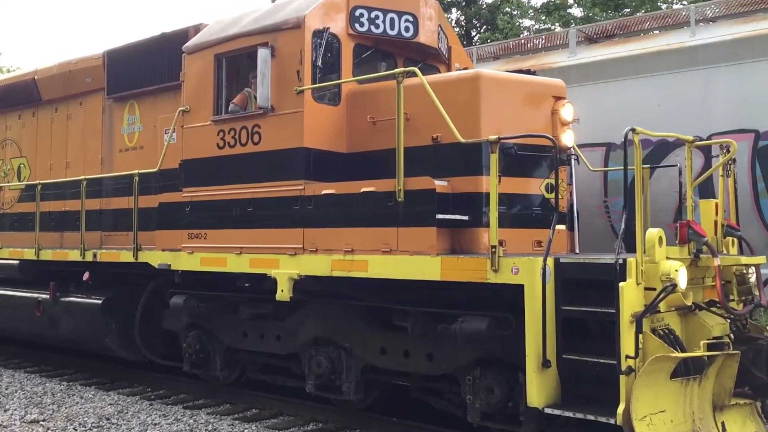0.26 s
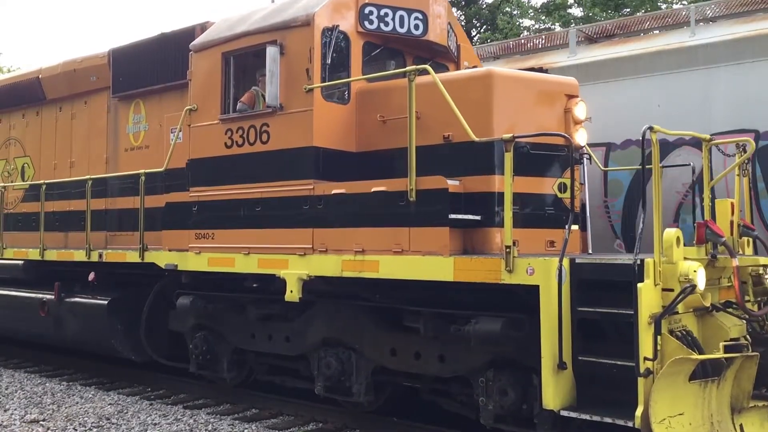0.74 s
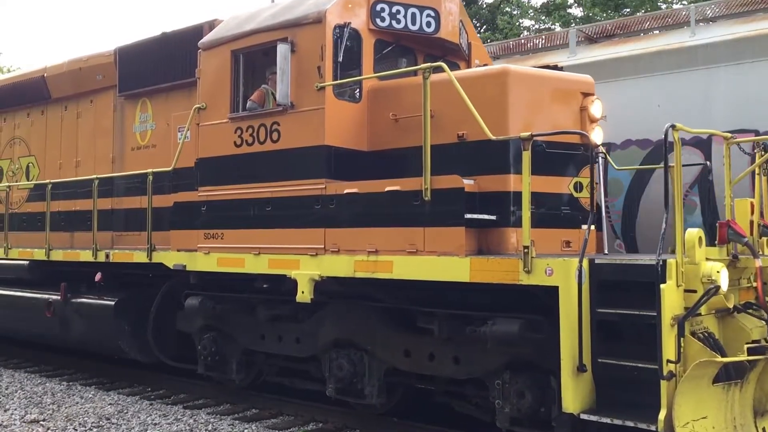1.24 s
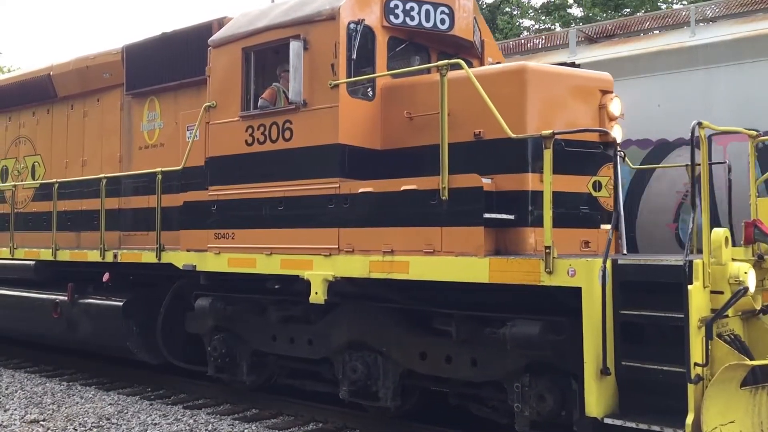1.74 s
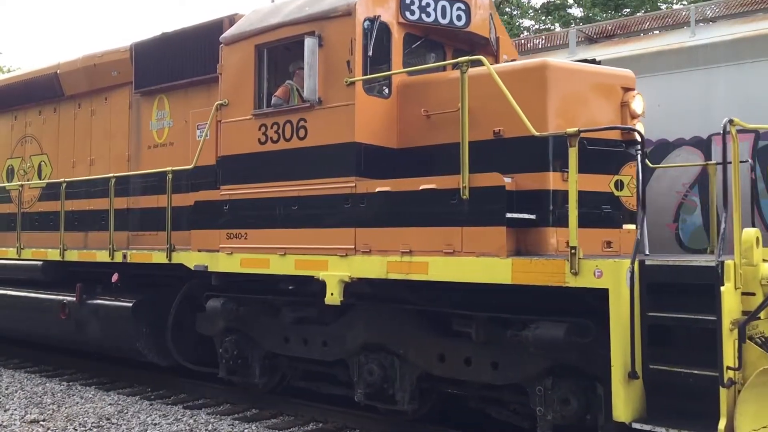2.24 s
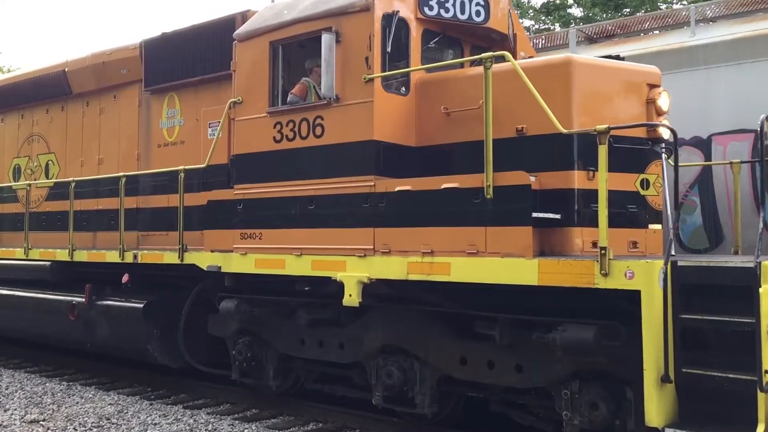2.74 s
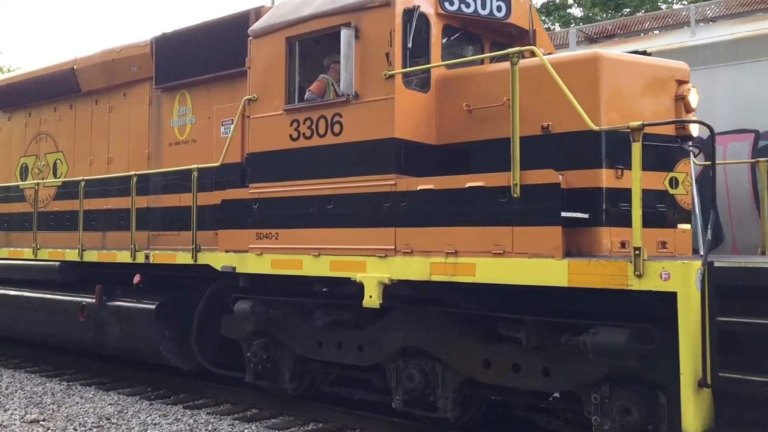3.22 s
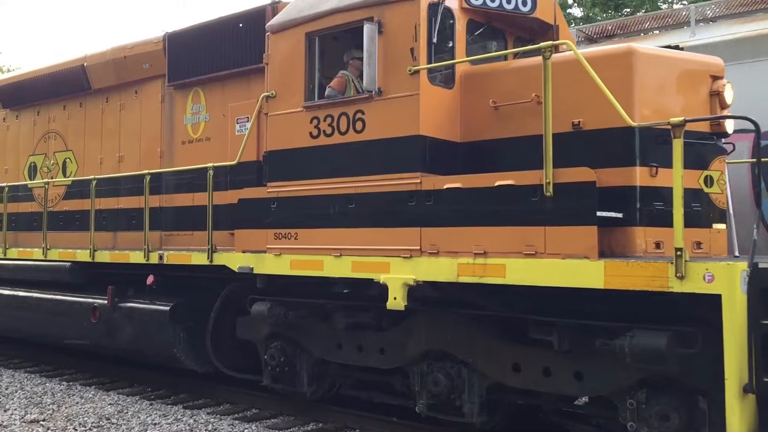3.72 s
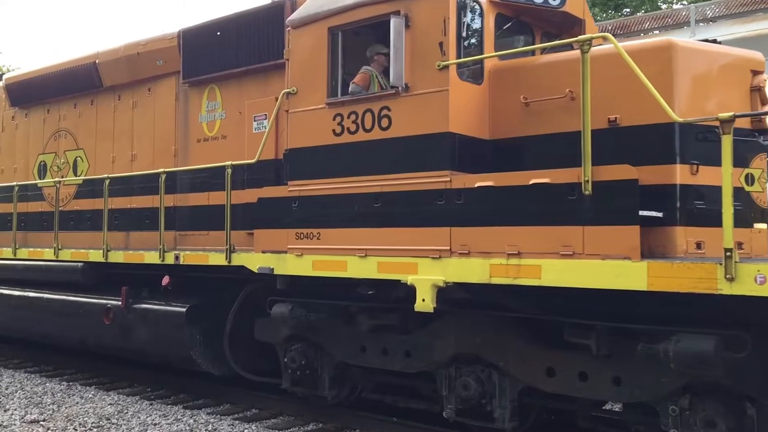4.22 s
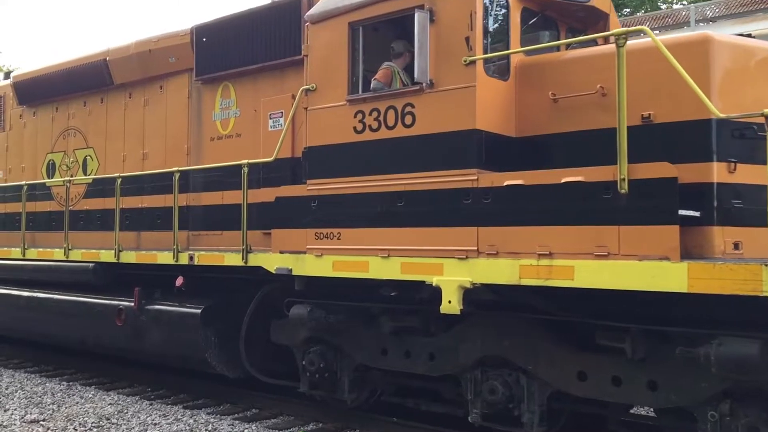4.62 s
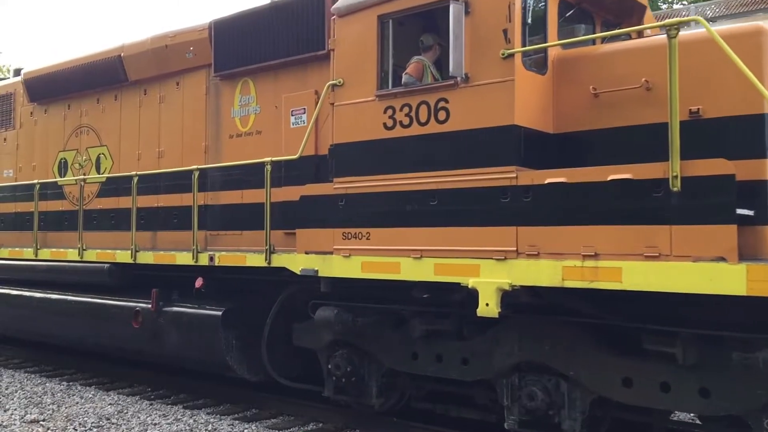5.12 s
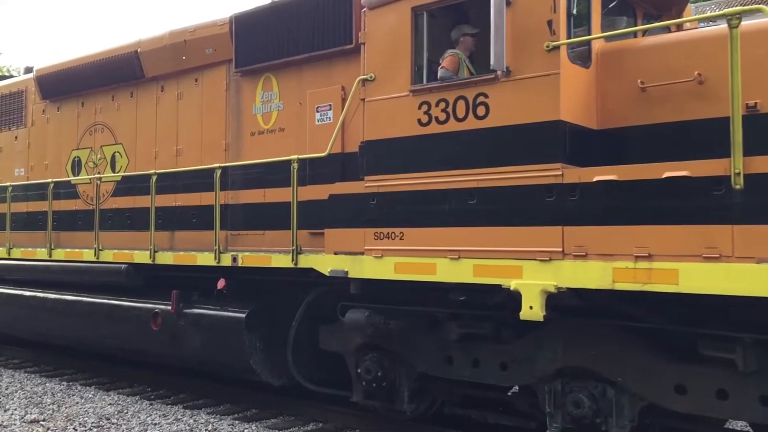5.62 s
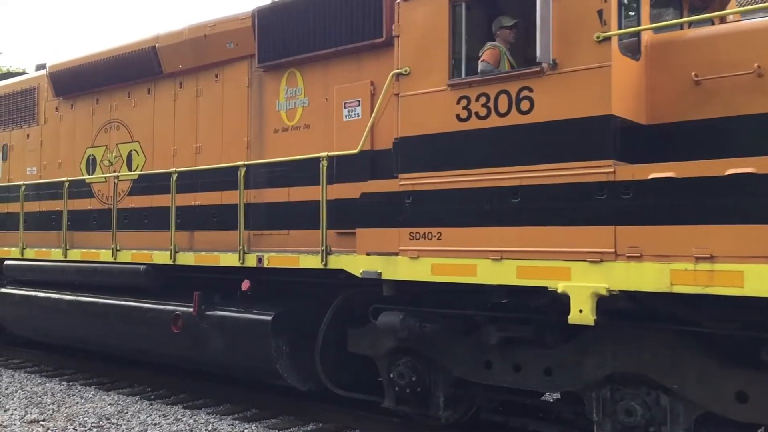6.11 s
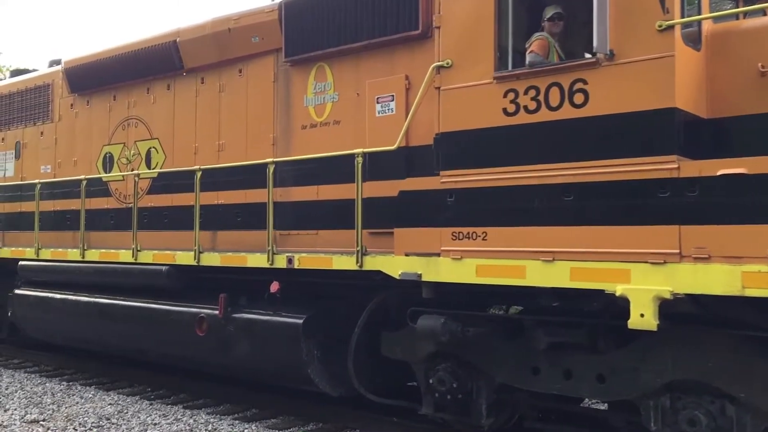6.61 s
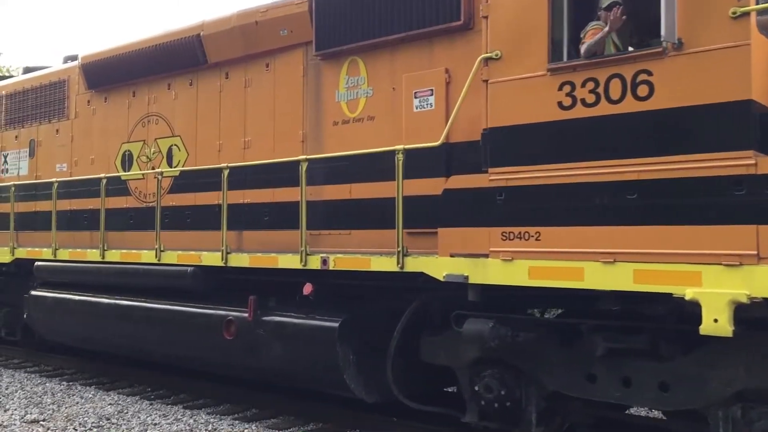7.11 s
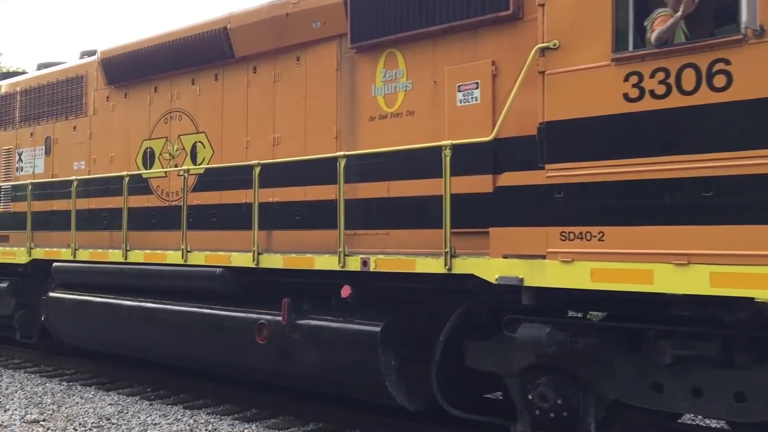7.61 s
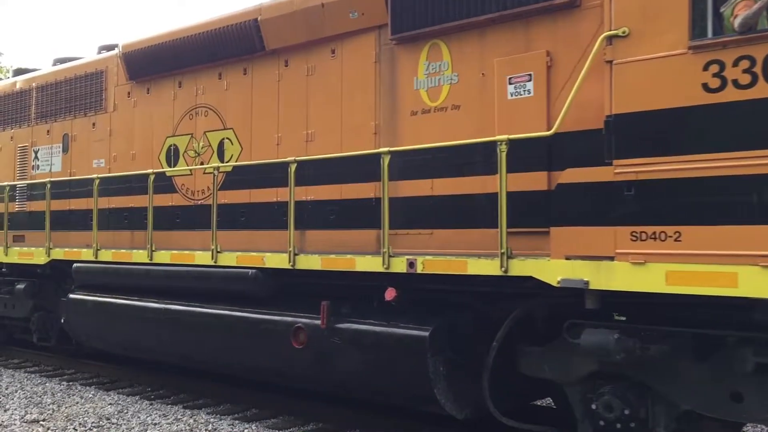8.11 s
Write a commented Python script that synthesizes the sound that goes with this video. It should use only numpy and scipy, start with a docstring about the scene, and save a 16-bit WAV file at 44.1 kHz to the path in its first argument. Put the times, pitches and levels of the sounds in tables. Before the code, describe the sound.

Two coupled diesel locomotives creep past a few metres from a trackside microphone, outdoors. Their low chugging drone rises slightly in pitch during the first two seconds, then holds, beating nearly three times a second. Wavering blower and fan whines ride over broad rushing air. Short sharp air spits come roughly once a second, strongest near the end, beside a brief steel squeak.

```python
"""Two coupled diesel locomotives throb a few metres from the microphone and throttle up one notch as they creep past.
Their sixteen-cylinder two-stroke engines turn at slightly different speeds, so harmonics of the two cranks beat.
Blowers, fans, a generator and gears whine as wavering sines at fixed multiples of crank speed.
Filtered noise makes the rushing air and the spits of a drain valve on the air tanks; near the end steel squeaks."""
import sys
import numpy as np
from scipy import signal
from scipy.fft import irfft
from scipy.io import wavfile

SR = 44100
rng = np.random.default_rng(int(sys.argv[2]) if len(sys.argv) > 2 else 0)


def store_wav(level_fs):
    """Save 16-bit WAV to argv[1]."""
    pcm = np.round(np.clip(np.atleast_2d(level_fs), -1, 1) * 32767)
    wavfile.write(sys.argv[1], SR, pcm.T.astype(np.int16))


N = 368229

# Crankshaft speed of the lead and trailing engines. Each row: time in seconds, speed in rpm.
LEAD_CRANK_SPEED = [(0, 593.0), (0.5, 610.7), (1, 628.0), (1.3, 636.3), (1.6, 641.5), (1.9, 643.6),
                    (2.3, 642.1), (2.8, 639.2), (3.5, 637.7), (4.5, 637.3), (5.5, 636.5), (6.5, 636.7),
                    (7.5, 636.9), (8.35, 636.9)]
TRAIL_CRANK_SPEED = [(0.0, 621.9), (0.35, 630.2), (0.7, 646.6), (1.0, 654.4), (1.3, 657.8), (1.7, 661.4),
                     (2.2, 660.2), (2.8, 657.4), (3.5, 657.7), (4.2, 655.8), (5.0, 657.1), (5.8, 655.6),
                     (6.6, 660.1), (7.3, 660.0), (8.35, 654.9)]
# Effort of the engines, heard in the rushing air. Each row: time in seconds, effort in dB.
ENGINE_EFFORT = [(0.0, -32.5), (0.49, -36.5), (1.0, -34), (2.81, -30.5), (6.14, -31.5), (7.56, -29.5),
                 (7.93, -30.5), (8.35, -29)]
# Lead engine's crank speed at the start and after throttling up; both exhausts are judged against these.
LEAD_START_RPM, LEAD_RUN_RPM = 593, 637


def from_db(db):
    """Decibels to gain."""
    return np.exp(np.asarray(db) * (np.log(10) / 20))


def rms_one(x):
    """Scale to unit power."""
    return x / np.sqrt(np.mean(x ** 2) + 1e-20)


def in_time(rows):
    """Each column of a curve, sample by sample."""
    s, *columns = np.transpose(rows)
    return [np.interp(np.arange(N) / SR, s, column) for column in columns]


def drift(rate_hz):
    """Smooth chance motion of spread 1: noise through two equal poles, made at every 40th sample."""
    step = 40
    r = np.exp(-2 * np.pi * rate_hz * step / SR)
    noise = rng.standard_normal(N // step + 2002)
    slow = signal.lfilter([1], [1, -2 * r, r * r], noise)[2000:]  # drop the filter's start
    return np.interp(np.arange(N) / step, np.arange(len(slow)), rms_one(slow))


def coloured_noise(spectrum, patchy_db):
    """Quarter-octave bands of noise, each flickering by itself; rms 1."""
    hz, level_db = np.transpose(spectrum)
    edges = 20 * 2 ** np.arange(0, 9.8, .25)
    white, out = rng.standard_normal((2, N)), np.zeros(N)
    for k, (low, high) in enumerate(zip(edges, edges[1:])):
        if high > hz[0] and low < hz[-1]:
            band_filter = signal.butter(2, [low, high], "band", fs=SR, output="sos")
            band = signal.sosfilt(band_filter, white[k % 2])  # neighbours use separate noise
            band_db = np.interp(np.log(low * high) / 2, np.log(hz), level_db)
            out += band * from_db(band_db + patchy_db * drift(5.6))
    return rms_one(out)


def tone(cycles, level_db, flutter, rate_hz):
    """A sine whose strength and phase waver."""
    angle = 2 * np.pi * cycles
    in_step = (1 + flutter * drift(rate_hz)) * np.cos(angle)
    out_of_step = flutter * drift(rate_hz) * np.sin(angle)
    return from_db(level_db) * (in_step + out_of_step) / np.sqrt(.5 + flutter ** 2)


def crank_turns(rpm_curve):
    """Turns of the crank made since the start."""
    return np.cumsum(in_time(rpm_curve)[0]) / (60 * SR)


def load(share):
    """Gain that follows a share of the effort as the engines take up the work."""
    effort_db, = in_time(ENGINE_EFFORT)
    return from_db(share * (effort_db - np.median(effort_db)))


def approach(level_db, db_per_s):
    """A level in dB that changes steadily as the lead unit creeps nearer, given for the moment midway."""
    midway_s = 4.2
    return level_db + db_per_s * (np.arange(N) / SR - midway_s)


def engines(lead, trail):
    """Both exhausts and the lead engine's clatter; the eighth orders beat nearly three times a second."""
    # Exhaust notes that change with throttle and nearness. Each row: multiple of crank speed, level in dB
    # at the lead's running speed before the stack's boom, gain from throttling up in dB, approach in dB per second.
    lead_main = [(5, -45.5, 13, 0.3), (6, -38.5, 16, 0), (7, -34.5, 1, 0), (8, -25.5, 1.5, -0.73),
                 (9, -34.5, 18, 1.8), (11, -31, 23, 0.16), (14, -37.5, 2, 0.8), (16, -28.5, 10, 0.41),
                 (17, -34, 7, 0), (18, -38, 0, -0.4), (20, -54, -17.5, 0)]
    trail_main = [(8, -27, 1, 0.091)]
    # Weaker notes from unequal cylinders. Each row: multiple of crank speed, level at median effort in dB.
    lead_weak = [(4, -75), (10, -42.5), (12, -46.5), (13, -42.5), (15, -41), (19, -66), (21, -46),
                 (22, -47.5), (23, -51.5), (25, -48.5), (30, -50), (36, -52.5), (40, -53), (44, -58.5),
                 (49, -53.5)]
    trail_weak = [(5, -52), (6, -40), (7, -45), (9, -36), (10, -36.5), (11, -43.5), (16, -56), (17, -46),
                  (21, -70), (27, -62)]
    strong = exhaust(lead, strong_notes(LEAD_CRANK_SPEED, lead_main), flutter=.06)
    strong += exhaust(trail, strong_notes(TRAIL_CRANK_SPEED, trail_main), flutter=.06)
    weak = exhaust(lead, lead_weak, flutter=.18) + exhaust(trail, trail_weak, flutter=.3) + clatter(lead)
    return strong + weak * load(share=1.0)


# The exhaust stack booms when a note comes through its resonance.
STACK_HZ, STACK_WIDTH_HZ, STACK_DB = 80.5, 0.67, 9


def strong_notes(rpm_curve, notes):
    """Level of each main exhaust note, set by throttle, nearness and the stack's resonance."""
    rpm, = in_time(rpm_curve)
    # 1 at the lead's starting speed, 0 at its running speed and above
    below_running = np.maximum(LEAD_RUN_RPM - rpm, 0) / (LEAD_RUN_RPM - LEAD_START_RPM)
    levels = []
    for order, level_db, throttle_db, db_per_s in notes:
        hz = order * rpm / 60
        boom_db = STACK_DB / (1 + ((hz - STACK_HZ) / STACK_WIDTH_HZ) ** 2)
        levels.append((order, approach(level_db, db_per_s) - throttle_db * below_running + boom_db))
    return levels


def exhaust(turns, orders, flutter):
    """Crank harmonics; near the firing note they bunch into one chug a turn, further down the pipes smear them."""
    out, cylinders = np.zeros(N), 16
    for order, level_db in orders:
        below = cylinders - order
        smear = .041 * below ** 2 - .0008 * below ** 3  # cycles
        # notes under the stack's resonance at the lead's running speed leave it a quarter cycle out of step
        stack_shift = .25 * (order * LEAD_RUN_RPM / 60 < STACK_HZ)
        out += tone(order * turns + smear - stack_shift, level_db, flutter, rate_hz=1.5)
    return out


def clatter(turns, level_db=-43.5, centre_hz=540, octaves=0.83):
    """Valves and injectors repeat one busy pattern on every turn of the crank."""
    size = 4096  # points in one turn
    hz = np.arange(1, size // 2 + 1) * turns[-1] * SR / N  # harmonics at the mean crank speed
    strength = np.exp(-(np.log2(hz / centre_hz) / octaves) ** 2) * rng.rayleigh(1, len(hz))
    phases = np.exp(2j * np.pi * rng.random(len(hz)))
    one_turn = irfft(np.append(0, strength * phases))
    return from_db(level_db) * rms_one(np.interp(turns, np.arange(size) / size, one_turn, period=1))


def blowers(lead, trail):
    """Each blower whines at multiples of its lobe rate; the lead's second harmonic flutters as echoes mix with it."""
    # Lead blower's lobe rate, before a trim of -1.3 dB. Each row: time in seconds, level in dB.
    first_level = [(0, -51), (0.85, -58), (1.35, -38.5), (2.0, -49), (2.8, -42.5), (3.55, -49),
                   (3.95, -41.5), (4.9, -41), (5.4, -47.5), (7.55, -35.5), (8.35, -40.5)]
    # Its piercing second harmonic. Each row: time in seconds, level in dB.
    second_level = [(0, -44), (0.5, -41.5), (1.1, -54.5), (1.3, -39), (1.6, -52), (2.15, -39), (2.6, -56),
                    (3.85, -48), (4.05, -41), (4.5, -39.5), (4.62, -59), (5.55, -49), (5.8, -43),
                    (6.25, -53), (7.0, -42), (7.3, -32.5), (7.85, -35), (8.1, -55)]
    # Its third harmonic. Each row: time in seconds, level in dB.
    third_level = [(0, -61.5), (1.2, -52.5), (1.6, -61), (4.9, -57.5), (5.15, -51), (7.2, -47.5),
                   (7.6, -59), (8.35, -52)]
    # Its fourth harmonic, which grows as it nears: level midway in dB, approach in dB per second.
    fourth_level = (-57, 1.0)
    lobes_per_turn = 144.27
    lobes = lobes_per_turn * lead
    first = tone(lobes, in_time(first_level)[0] - 1.3, flutter=0.15, rate_hz=5.8)
    second = tone(2 * lobes, in_time(second_level)[0], flutter=.15, rate_hz=22)
    angle = 2 * np.pi * 2 * lobes
    echoes = from_db(-47) * (drift(9) * np.cos(angle) + drift(9) * np.sin(angle))
    third = tone(3 * lobes, in_time(third_level)[0], flutter=0.39, rate_hz=11)
    fourth = tone(4 * lobes, approach(*fourth_level), flutter=0.69, rate_hz=18)
    trail_whine = tone(2 * lobes_per_turn * trail, -51, flutter=1.0, rate_hz=7.5)
    return first + second + echoes + third + fourth + trail_whine


def fans_and_gears(lead):
    """Fans, generator and gear train are driven by the crankshaft and climb with it."""
    # Levels as each machine's vent passes by. Each row: time in seconds, level in dB.
    fan_level = [(0, -52), (2.35, -42), (2.75, -34), (3.5, -39.5), (4.5, -43.5), (5.2, -39.5), (5.9, -48),
                 (8.35, -47)]
    second_fan_level = [(0, -59), (2.8, -72), (4.0, -51), (5.3, -67), (6.4, -48), (7.35, -38.5),
                        (8.0, -56.5)]
    generator_level = [(0, -46), (2.2, -58), (3.0, -47), (5.0, -45), (6.8, -43), (8.35, -51)]
    # Faint gear and fan tones. Each row: multiple of crank speed, level at median effort in dB.
    gear_tones = [(31.75, -45.5), (47.6, -51), (63.43, -48.5), (113, -47.5), (158.05, -52), (282.5, -50.5),
                  (554.6, -60), (565, -63), (721.4, -75)]
    # each machine's tone is a fixed number of cycles per crank turn
    fan = tone(79.1 * lead, in_time(fan_level)[0], flutter=.45, rate_hz=12)
    second_fan = tone(95.24 * lead, in_time(second_fan_level)[0], flutter=0.24, rate_hz=8.4)
    generator = tone(100.8 * lead, in_time(generator_level)[0], flutter=0.12, rate_hz=7.6)
    gears = sum(tone(ratio * lead, db, flutter=0.8, rate_hz=7.6) for ratio, db in gear_tones)
    return fan + second_fan + generator + load(share=0.58) * gears


def drain_valve(rise_s=0.0018, open_s=0.00069, close_t60=0.024, tail_db=-10.5, tail_t60=0.13):
    """Each spit is a short burst of escaping air, then its scatter between underframe and ballast."""
    # Each row: start in seconds, strength in dB before a trim of -7 dB, nozzle ring in Hz,
    # strength of the ring in dB against the spray.
    spits = [(0.9263, -21.5, 6100, -11), (2.2948, -19.5, 5600, -3), (3.8732, -18.5, 6470, -3),
             (4.995, -18.5, 5770, -1), (6.252, -19.5, 6760, -8), (6.9182, -27, 5540, 0),
             (7.5657, -12, 5540, -9), (8.213, -15, 6250, -13)]
    # Colour of the spray. Each row: frequency in Hz, relative level in dB per Hz.
    spray_colour = [(2000, -25), (4000, 4.5), (5000, -3), (6200, 6.5), (8000, -10.5), (10500, -2.5),
                    (13000, 0.5), (15500, -5)]
    out, spray = np.zeros(N), coloured_noise(spray_colour, patchy_db=3.5)
    for s, strength_db, ring_hz, ring_db in spits:
        start = round(s * SR)
        stop = min(start + SR, N)
        age = np.arange(stop - start) / SR
        jet = from_db(-60 * np.maximum(age - open_s, 0) / close_t60)
        scatter = from_db(tail_db - 60 * age / tail_t60)
        envelope = from_db(strength_db - 7) * np.minimum(age / rise_s, 1) * np.hypot(jet, scatter)
        ring = from_db(ring_db) * nozzle_ring(ring_hz)[:len(age)]
        out[start:stop] += envelope * (spray[start:stop] + ring)
    return out * from_db(1.3 * drift(130))  # ragged flow


def nozzle_ring(hz, width_hz=600):
    """Air hissing through the valve's short outlet: noise through one resonance, one second of it; rms 1."""
    r = np.exp(-np.pi * width_hz / SR)
    poles = [1, -2 * r * np.cos(2 * np.pi * hz / SR), r * r]
    return rms_one(signal.lfilter([1, 0, -1], poles, rng.standard_normal(SR)))


def squeak():
    """Steel in the running gear rubs on steel for a moment: a gliding, wavering sine."""
    # Each row: time in seconds, pitch in Hz, level in dB.
    glide = [(7.54, 1745, -70), (7.58, 1785, -39), (7.64, 1874, -43), (7.69, 1830, -48), (7.73, 1820, -72)]
    hz, level_db = in_time(glide)
    # the first level holds very faintly until the squeak; near the lowest end level the tone is cut off
    sounding = level_db > min(level_db[0], level_db[-1]) + 1
    return tone(np.cumsum(hz) / SR, level_db, flutter=.4, rate_hz=30) * sounding


def air(lead):
    """Turbulence of the exhaust, the cooling fans and the intake: noise that follows the effort."""
    # Colours of the three layers. Each row: frequency in Hz, relative level in dB per Hz.
    rumble_colour = [(22, -27), (35, -20), (50, 5), (70, 6.5), (100, 4.5), (130, -7), (180, 0.5),
                     (260, -8.5), (400, -35)]
    roar_colour = [(150, 4.5), (250, 4), (400, 0), (650, 2), (1000, -0.5), (1400, -3), (1650, -4.5),
                   (1900, -10.5), (2500, -13), (3500, -19), (5000, -38)]
    hiss_colour = [(2000, 4.5), (3300, 2), (4500, 6), (5000, -16.5), (5700, 6), (6100, -8.5), (6800, -2),
                   (7600, 2.5), (9500, -31), (10400, -11.5), (11500, -9), (15500, -15)]
    # Levels midway in dB relative to the effort, then approach in dB per second.
    rumble_level = (-3, 0.067)
    roar_level = (-0.75, 0.02)
    hiss_level = (-16, 0.53)
    whistle_level = (-16.0, -0.05)
    # Breathy bands. Each row: multiple of crank speed, width in Hz, level in dB within the whistle layer.
    whistle_bands = [(843.5, 244, 1.5), (579, 320, -10), (432, 160, -9)]
    rumble = from_db(approach(*rumble_level)) * coloured_noise(rumble_colour, patchy_db=2.1)
    roar = from_db(approach(*roar_level)) * coloured_noise(roar_colour, patchy_db=1.24)
    hiss = from_db(approach(*hiss_level)) * coloured_noise(hiss_colour, patchy_db=.3)
    bands = sum(from_db(db) * turbine_whistle(lead, ratio, width_hz) for ratio, width_hz, db in whistle_bands)
    whistles = from_db(approach(*whistle_level)) * bands
    return from_db(in_time(ENGINE_EFFORT)[0]) * (rumble + roar + hiss + whistles)


def turbine_whistle(turns, ratio, width_hz):
    """A breathy band riding on engine speed: slow noise shifted up to a multiple of crank speed; rms 1."""
    r = np.exp(-2 * np.pi * width_hz / SR)
    a, b = signal.lfilter([1], [1, -2 * r, r * r], rng.standard_normal((2, N)))
    angle = 2 * np.pi * ratio * turns
    return rms_one(a * np.cos(angle) + b * np.sin(angle))


def scene():
    """Everything heard from one spot beside the track, on one channel."""
    lead, trail = crank_turns(LEAD_CRANK_SPEED), crank_turns(TRAIL_CRANK_SPEED)
    machinery = engines(lead, trail) + blowers(lead, trail) + fans_and_gears(lead)
    return (machinery + drain_valve() + squeak() + air(lead))[None]


def record(dry):
    """The microphone channel cuts the treble steeply above 15.9 kHz."""
    return signal.sosfilt(signal.ellip(10, .2, 80, 15900, fs=SR, output="sos"), dry)


dry = scene()
out = record(dry)
store_wav(out)
```